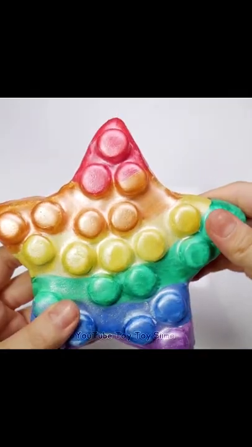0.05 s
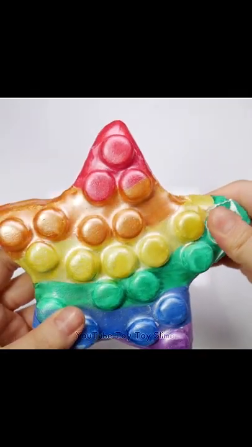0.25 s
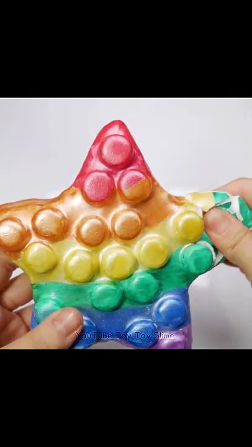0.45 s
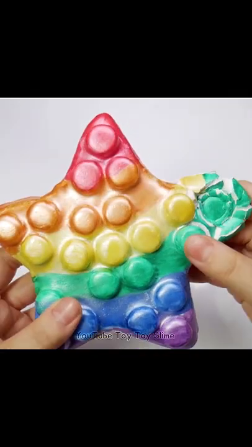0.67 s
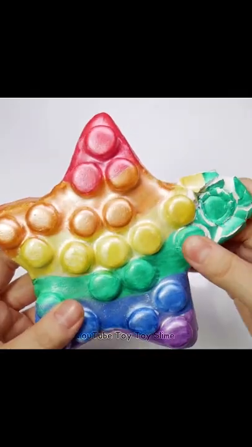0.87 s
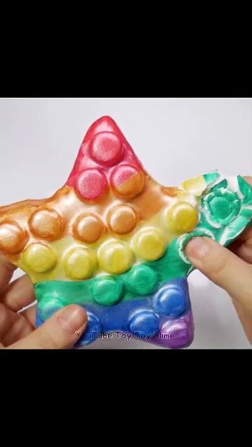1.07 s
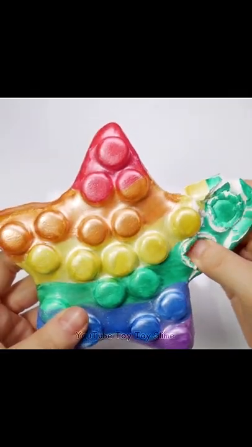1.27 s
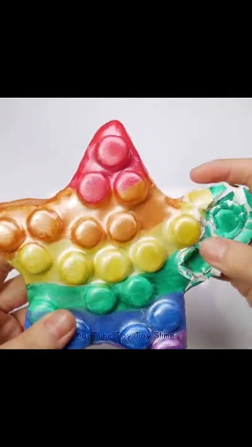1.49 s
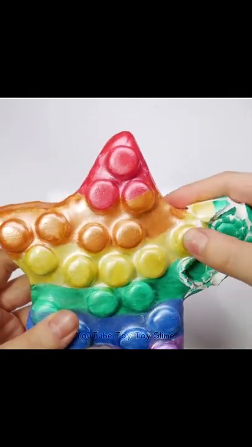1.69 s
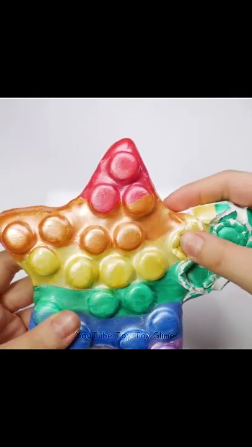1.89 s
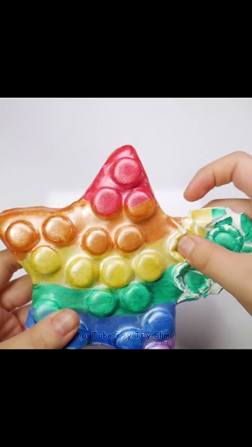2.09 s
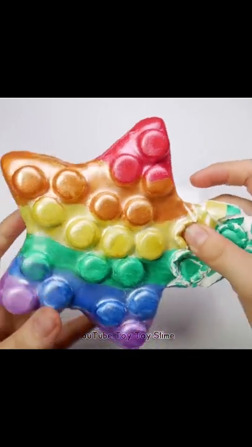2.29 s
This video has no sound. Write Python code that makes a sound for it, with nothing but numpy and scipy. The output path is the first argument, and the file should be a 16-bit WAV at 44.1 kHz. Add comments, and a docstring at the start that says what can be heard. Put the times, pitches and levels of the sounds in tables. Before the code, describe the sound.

A hollow clay shell cracks under a thumb in three crunchy bursts of sharp snaps and dull thumps. Crumbs crackle and broken edges grind briefly in between, close to the microphone in a small, quiet room.

```python
"""A hard, hollow clay shell breaks under a thumb, close to the microphone in a small room.
Each fracture is a sharp tick and a few cycles of the piece that breaks free; at this distance the loudest
overload the recorder, with dull thumps. Crumbs crackle after them, broken edges grind, the wall knocks.
Shell and room ring on briefly over a faint hiss and hum."""
import sys
import numpy as np
from scipy import signal
from scipy.fft import rfft, irfft
from scipy.io import wavfile

SR = 44100
rng = np.random.default_rng(int(sys.argv[2]) if len(sys.argv) > 2 else 0)


def inscribe(sig):
    """Save sig as 16-bit PCM at rate SR to the path in sys.argv[1].

    A 1-D sig is mono; a 2-D sig holds one channel per row.
    Samples are clipped to [-1, 1] before scaling.
    """
    pcm = np.round(np.clip(np.atleast_2d(sig).T, -1, 1) * 32767)
    wavfile.write(sys.argv[1], SR, pcm.astype(np.int16))


N = 108045
MILLISECOND = SR / 1000  # samples; fracture and knock levels count their energy over this span
SIDE = np.array([[1], [-1]])  # added on the left, subtracted on the right


def undb(db):
    """Decibels to gain."""
    return 10 ** (np.asarray(db) / 20)


def unit(x):
    """Scale each row to an energy of one."""
    return x / np.sqrt(np.sum(x ** 2, axis=-1, keepdims=True) + 1e-18)


def add(out, s, x):
    """Mix x into out from time s."""
    i = min(max(int(s * SR), 0), out.shape[-1])
    out[..., i:i + x.shape[-1]] += x[..., :out.shape[-1] - i]


def colour(x, points, size=2048):
    """Minimum-phase filter through points of (frequency [Hz], gain [dB])."""
    hz, db = np.array(points, float).T
    bins_hz = np.maximum(np.arange(size // 2 + 1) * SR / size, 1)
    gain = undb(np.interp(np.log(bins_hz), np.log(hz), db))
    cepstrum = irfft(np.log(gain))
    cepstrum[1:size // 2] *= 2
    cepstrum[size // 2 + 1:] = 0
    return signal.fftconvolve(x, irfft(np.exp(rfft(cepstrum))))[:len(x)]


def fade(t, t60):
    """Exponential decay, 60 dB down at t60."""
    return np.exp(-np.log(1000) * t / t60)


def ring(t, hz, cycles, top_hz=15800):
    """A damped oscillation that starts from rest and carries no bass."""
    wave = np.sin(2 * np.pi * min(hz, top_hz) * t) * fade(t, cycles / hz)
    return unit(np.diff(wave, prepend=0))


# Colour of the quiet room at the microphone (frequency [Hz], gain [dB])
HISS_COLOUR = [(30, -8.5), (60, -20.5), (150, -16), (250, -12.5), (400, -1.5), (700, -3.5),
               (1200, 0.5), (2300, -2), (4500, -4.5), (8000, -12), (15500, -13)]
def room_tone(hiss_db=-57.5, hum_hz=156, hum_db=-85.5):
    """Faint hiss around the microphone, with a low hum in the centre."""
    mid, side = (unit(colour(rng.standard_normal(N), HISS_COLOUR)) * np.sqrt(N) for _ in range(2))
    hum = undb(hum_db) * np.sqrt(2) * np.sin(2 * np.pi * hum_hz * np.arange(N) / SR)
    return undb(hiss_db) * (mid + undb(-8) * side * SIDE) + hum


# Colour of the small room's answer at the microphone (frequency [Hz], gain [dB])
ROOM_COLOUR = [(60, 1.5), (250, 4.5), (500, 3), (800, 1.5), (1100, 0), (2200, 2.5), (3200, -5), (4600, 3),
               (7000, 1), (11000, 0.5), (16000, -13)]
def room_response(t, t60=0.14, treble_t60=0.128, treble_hz=5970, build_s=0.0052, side_db=-20.5):
    """Stereo reflections build up quickly and fade, the treble a little sooner."""
    noise = unit(rng.standard_normal((2, len(t))))
    low = signal.sosfiltfilt(signal.butter(2, treble_hz, fs=SR, output="sos"), noise)
    tail = low * fade(t, t60) + (noise - low) * fade(t, treble_t60)
    tail *= 1 - np.exp(-t / build_s)
    mid, side = (colour(row, ROOM_COLOUR) for row in unit(tail))
    return mid + undb(side_db) * side * SIDE


# Modes of the hollow shell in the hand (frequency [Hz], relative level [dB])
SHELL_MODES = [(1098, -0.5), (2089, 2.5), (2267, 3.5), (2356, -3), (3154, -5.5), (3402, -6.5), (4601, 1.5)]
def shell_response(t, t60=0.11):
    """The shell rings on, each mode stirred with a random strength and phase."""
    modes = sum(undb(db) * rng.standard_normal() * np.sin(2 * np.pi * (hz * t + rng.random()))
                for hz, db in SHELL_MODES)
    return unit(modes * fade(t, t60))


def reverberate(send, grip_s=0.02, shell_db=-19, room_db=-9.5):
    """The break wanders and the grip shifts, so each moment stirs shell and room differently."""
    out, hop = np.zeros((2, N)), int(grip_s * SR)
    t = np.arange(SR // 4) / SR
    for i in range(0, N, hop):
        response = undb(room_db) * room_response(t) + undb(shell_db) * shell_response(t)
        add(out, i / SR, signal.fftconvolve(send[None, i:i + hop], response, axes=1))
    return out


# Dull overload thumps from cracks close to the microphone (time [s], level [dB])
OVERLOAD_THUMPS = [(.264, -23.5), (.322, -24.5), (.347, -20.5), (1.007, -29.5), (1.114, -25),
                   (1.165, -24.5), (1.81, -30.5), (1.85, -31), (1.945, -17.5), (2.052, -28), (2.123, -32)]
def thumps(rise_s=0.0003):
    """Short, dull low thumps as the loudest cracks overload the recorder."""
    out, t = np.zeros(N), np.arange(512) / SR
    pulse = t / rise_s * np.exp(1 - t / rise_s)
    for s, db in OVERLOAD_THUMPS:
        add(out, s, undb(db) * pulse)
    return out


# Close knocks under the deeper breaks (time [s], level [dB], ring [Hz])
WALL_KNOCKS = [(.2985, -16, 1030), (.346, -4.5, 1026), (0.967, -22.5, 950), (1.0072, -9.5, 1075),
               (1.1136, -7, 1110), (1.1712, -17, 1030), (1.2873, -25.5, 860)]
def knocks():
    """The wall around the hollow flexes with a short woody note."""
    out, t = np.zeros((2, N)), np.arange(1024) / SR
    for s, db, hz in WALL_KNOCKS:
        add(out, s, undb(db) * np.sqrt(MILLISECOND) * ring(t, hz, cycles=5))
    return out


# Partials of a freed piece, heard close (ratio to its ring [1], relative level [dB], 60 dB fade [cycles])
PIECE_PARTIALS = [(0.619, -20, 8), (1, 4.5, 9.5), (1.3, -1, 11), (1.9, -15, 9.5)]
def fracture(db, hz, tick_db, tick_s=0.00056, tick_hz=5030, body_band_hz=(730, 5570)):
    """A tick and a short ring: row 0 goes straight to the microphone, row 1, broader, into the room."""
    t = np.arange(512) / SR
    detune = np.exp(0.009 * rng.standard_normal(len(PIECE_PARTIALS)))
    piece = unit(sum(undb(level) * ring(t, hz * ratio * shift, cycles)
                     for (ratio, level, cycles), shift in zip(PIECE_PARTIALS, detune)))
    # All sides of the shell together radiate one broad band that partly follows the piece's pitch.
    diffuse_hz = 2700 * (hz / 2700) ** 0.32 * detune[0]
    diffuse = undb(0.5) * ring(t, diffuse_hz, cycles=2.74)
    body = signal.lfilter(*signal.butter(3, body_band_hz, "band", fs=SR), np.array([piece, diffuse]))
    burst = rng.standard_normal(len(t)) * np.exp(-t / tick_s)
    tick = unit(signal.lfilter(*signal.butter(2, tick_hz, "high", fs=SR), burst))
    return undb(db) * np.sqrt(MILLISECOND) * (body * rng.choice([-1, 1]) + undb(tick_db) * tick)


def cluster(db, hz, tick_db, length_s, scatter_db, count):
    """Several quick fractures of unequal size, together as strong as one of the given level."""
    out = np.zeros((2, int(length_s * SR) + SR // 50))
    for place, (size, pitch) in zip(rng.random(count), rng.standard_normal((count, 2))):
        add(out, place * length_s, fracture(scatter_db * min(size, 2), hz * np.exp(0.2 * pitch), tick_db))
    return unit(out) * undb(db) * np.sqrt(MILLISECOND * (1 + undb(tick_db) ** 2))


# Broken edges grinding near the microphone (time [s], length [s], level [dB], centre ring [Hz])
EDGE_RUBS = [(0.25, 0.15, -38.5, 2030), (1.036, 0.067, -39, 2800), (1.12, 0.068, -25.5, 2820),
             (1.236, 0.051, -41.5, 2920), (1.279, 0.036, -28, 3940), (1.474, 0.065, -25.5, 3420),
             (1.507, 0.015, -20.5, 3100), (1.521, 0.049, -27, 2940), (1.569, 0.014, -19, 2720),
             (1.725, 0.094, -52.5, 2800), (1.795, 0.03, -19, 3400), (1.911, .024, -34, 2700),
             (1.94, 0.035, -29, 2300), (2.058, 0.045, -22.5, 2800), (2.309, 0.18, -44, 3400)]
def rubs(spots=10, slips_per_s=6000, swell_s=0.0078, pitch_spread=0.4, top_hz=9700, send_db=-7):
    """Rough edges slip in a dense, even stream of tiny fractures, at several spots with a pitch each."""
    out = np.zeros((2, N))
    for s, length_s, db, hz in EDGE_RUBS:
        t = np.arange(int(length_s * SR)) / SR
        swell = np.minimum(t / swell_s, 1)
        grains = 0
        for pitch in rng.permutation(np.linspace(-1, 1, spots)):
            slipping = rng.random(len(t)) < slips_per_s / spots / SR
            slips = slipping * rng.standard_normal(len(t)) * swell
            grain = fracture(0, hz * np.exp(pitch_spread * pitch), tick_db=-1.5)
            grains = grains + signal.fftconvolve(slips[None], grain, axes=1)
        add(out, s, unit(grains) * undb(db) * np.sqrt(length_s * SR))
    dulled = signal.lfilter(*signal.butter(2, top_hz, fs=SR), out)  # rubbing is duller than breaking
    return dulled * undb([[0], [send_db]])


# Small fractures close to the microphone (time [s], level [dB], ring [Hz], tick relative to ring [dB])
SMALL_CRACKS = [(0.114, -31, 3600, 2.5), (0.1626, -26, 4400, 9.5), (0.1885, -22, 2180, -5.5),
                (0.204, -8.5, 2190, -9), (0.232, -16.5, 2060, -13.5), (0.2395, -9, 1970, -2),
                (0.247, -21, 2250, -21), (0.2632, -0.5, 2250, -8), (0.2686, -7.5, 2310, -11),
                (0.2976, -7, 2600, -2), (0.3093, -16, 2670, 0.5), (0.3214, -2.5, 1900, -14.5),
                (0.326, -9.5, 2700, -14), (0.3422, -7, 2840, 0.5), (0.3522, -5, 2390, -8),
                (0.3609, -3, 2470, -23), (0.3789, -7.5, 3080, -3), (0.3953, -20.5, 3030, 10.5),
                (0.4366, 1, 2700, -4.5), (0.4595, -10, 2600, -11), (0.47, -16.5, 3400, -3.5),
                (0.6487, -40.5, 4430, -3.5), (0.867, -22.5, 3260, -1), (0.8749, -29, 2296, -18),
                (0.9436, -11.5, 3460, 3), (0.952, -15, 3830, -11), (0.9655, -16.5, 2320, 0),
                (0.9865, -29, 2740, 7.5), (1.0134, -1.5, 3840, -13), (1.1065, -10, 3500, -13),
                (1.1714, -7, 2500, -6), (1.1969, -18, 3120, 7.5), (1.228, -15.5, 4300, -4),
                (1.2445, -16.5, 2180, -2), (1.2856, -8.5, 3400, 3), (1.2904, -12, 4070, 6.5),
                (1.3128, -24.5, 4230, 5), (1.3653, -24.5, 4250, 0.5), (1.4837, -21, 2880, -13.5),
                (1.4999, -10, 3050, -8), (1.7983, -3.5, 3000, -5.5), (1.827, -5.5, 3120, -0.5),
                (1.8494, -9, 2700, 3.5), (1.9253, -17, 2120, -12), (1.9409, -3, 4070, -8),
                (1.9705, -5, 2140, -2), (2.0045, -20, 3100, -3.5), (2.0656, -4, 2580, 2.5),
                (2.1227, -4.5, 4050, -6), (2.1909, -14.5, 3260, -5.5), (2.1953, -11, 2890, -9),
                (2.2403, -33, 2230, 2), (2.3412, -25.5, 5100, 2.5), (2.3756, -26.5, 4960, -3.5),
                (2.4013, -24, 1940, -12), (2.433, -14, 2600, -2.5)]
def cracks(first_db=-1.5, steps_db=-5.5, wait_s=0.0003):
    """The clay breaks once, then the crack jumps on in two smaller, duller steps."""
    out = np.zeros((2, N))
    for s, db, hz, tick_db in SMALL_CRACKS:
        send_db = 0.5 + 0.33 * min(tick_db, 0)  # dull pops stay dry, crisp ones carry into the room
        routing = undb([[0], [send_db]])
        add(out, s, routing * fracture(db + first_db, hz, tick_db))
        steps = cluster(db + steps_db, hz, tick_db - 2, length_s=0.0012, scatter_db=12.5, count=2)
        add(out, s + wait_s, routing * steps)
    return out


# Big snaps at close range (time [s], level [dB], ring [Hz], tick relative to ring [dB], split length [s])
BIG_SNAPS = [(0.3452, 11, 3400, -1.5, 0.0028), (1.0052, 7, 2980, -3.5, 0.0013),
             (1.1128, 5, 2280, 0.5, 0.0021), (1.1646, 4, 3500, 0.5, .0015),
             (1.8091, 6.5, 2750, 2.5, 0.0013), (1.9446, 10, 2600, -10, 0.0017),
             (2.0502, 9.5, 3100, -8.5, .002)]
def snaps(warning_s=0.002, warning_db=-30.5, split_db=-6, crumbs=14, crumb_spread_s=0.011, send_db=-1):
    """The wall gives way: a warning tick, the break, a split that runs on, then crumbs that thin out."""
    out = np.zeros((2, N))
    for s, db, hz, tick_db, run_s in BIG_SNAPS:
        add(out, s - warning_s, fracture(db + warning_db, hz, tick_db))
        add(out, s, fracture(db + split_db, hz, tick_db))
        add(out, s, cluster(db + split_db, hz, tick_db, run_s, scatter_db=7.0, count=5))
        for wait, size, pitch in rng.standard_normal((crumbs, 3)):
            crumb_db = db - 31 + 5 * min(size, 2)
            crumb = fracture(crumb_db, hz * np.exp(0.35 * pitch), tick_db)
            add(out, s + abs(wait) * crumb_spread_s, crumb)
    return out * undb([[0], [send_db]])


# Colour of the short path from shell to microphone (frequency [Hz], gain [dB])
DIRECT_COLOUR = [(60, -32), (250, -16.5), (500, -7), (800, 0.5), (1100, 1), (2500, 1.5), (4500, -0.5),
                 (7000, 0), (11000, -3.5), (16000, -3.5)]
def scene(port_side_db=-32):
    """The breaking clay, heard directly at two close microphone ports and through shell and room."""
    background = room_tone()
    port_difference = undb(port_side_db) * unit(rng.standard_normal(64))
    close, send = cracks() + knocks() + snaps() + rubs()
    direct = colour(close, DIRECT_COLOUR)
    width = np.convolve(direct, port_difference)[:N] * SIDE
    return direct + thumps() + width + reverberate(send) + background


# Response of the recorder behind the microphone (frequency [Hz], gain [dB])
RECORDER_COLOUR = [(30, -15.5), (250, -6.5), (700, -0.5), (16000, -1)]
def record(dry, ceiling=0.87, distortion_low_hz=700, top_hz=15800):
    """The loudest snaps clip, with little bass in the distortion; the bass is thinned and the top cut."""
    overload = np.clip(dry, -ceiling, ceiling) - dry
    low_cut = signal.butter(2, distortion_low_hz, "high", fs=SR, output="sos")
    clipped = dry + signal.sosfiltfilt(low_cut, overload)
    thinned = np.array([colour(channel, RECORDER_COLOUR) for channel in clipped])
    return signal.sosfiltfilt(signal.ellip(8, 0.1, 50, top_hz, fs=SR, output="sos"), thinned)


dry = scene()
out = record(dry)
inscribe(out)
```